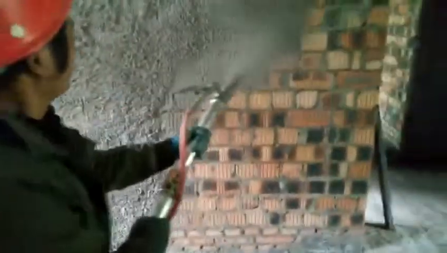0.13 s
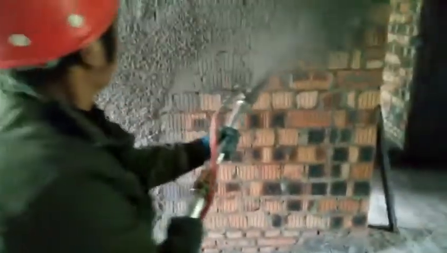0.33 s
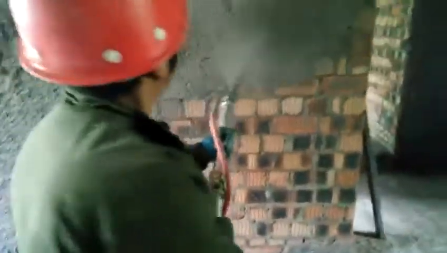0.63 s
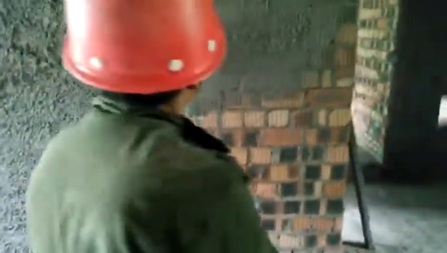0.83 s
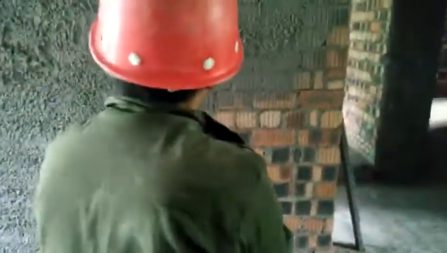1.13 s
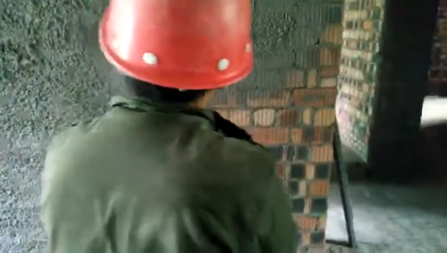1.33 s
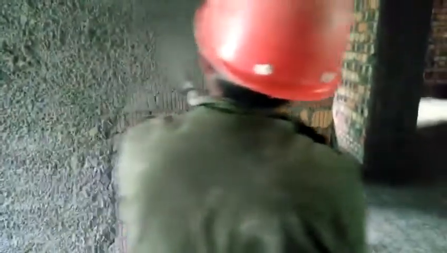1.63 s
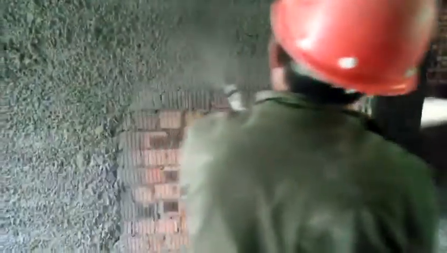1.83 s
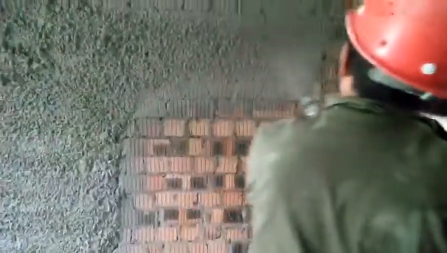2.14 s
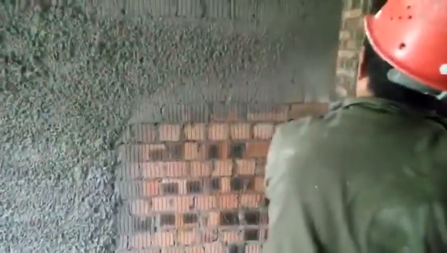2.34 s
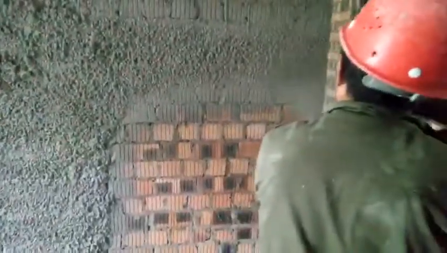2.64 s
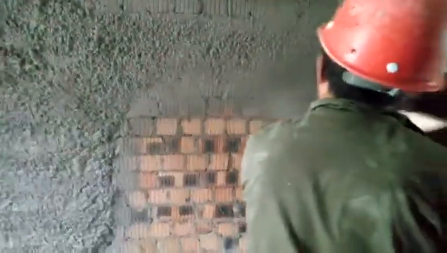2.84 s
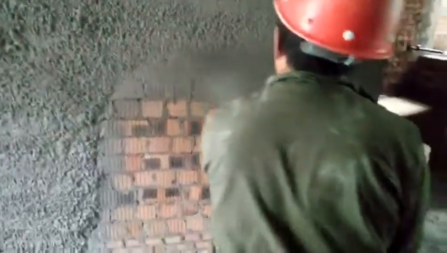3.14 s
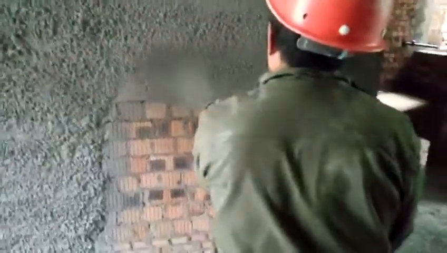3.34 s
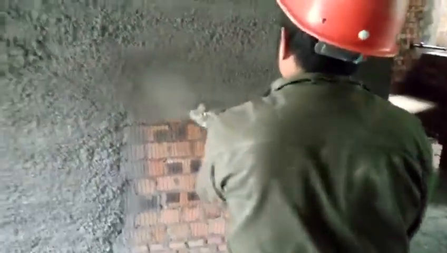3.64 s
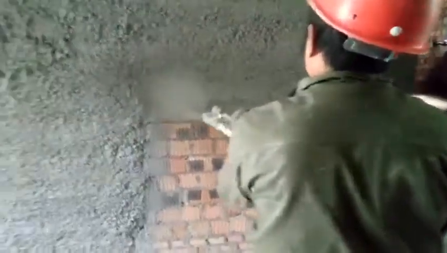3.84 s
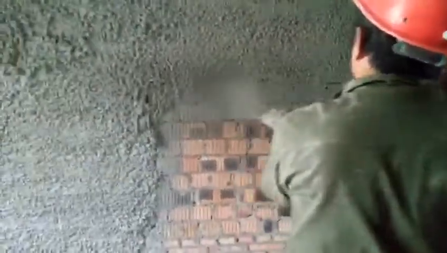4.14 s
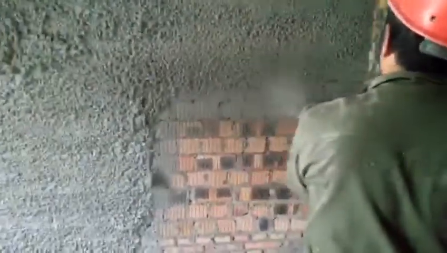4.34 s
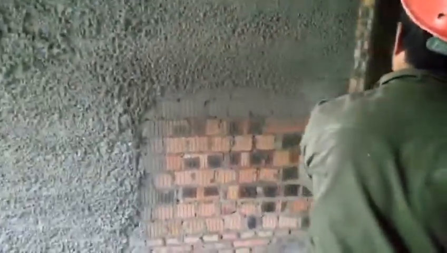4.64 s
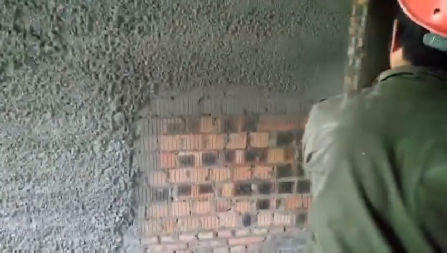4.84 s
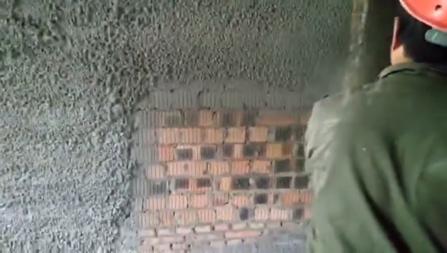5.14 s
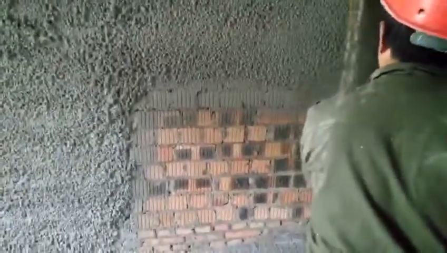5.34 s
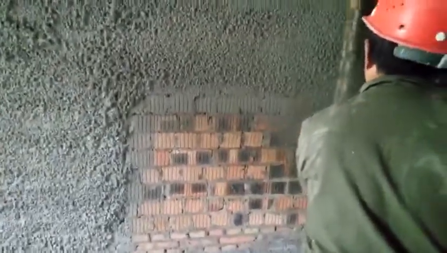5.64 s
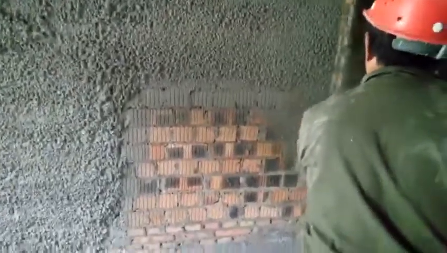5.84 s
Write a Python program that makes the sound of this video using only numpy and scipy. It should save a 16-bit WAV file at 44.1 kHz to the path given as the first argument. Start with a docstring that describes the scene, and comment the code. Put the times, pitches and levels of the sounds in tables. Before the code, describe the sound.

A compressed-air mortar gun blasts without pause, a step or two from the microphone. The dense midrange roar has a bright, noisy ring, sandy rasp and high hiss. It flutters unevenly as slugs and air pockets pass. Hollow gurgles and rough little puffs come from the wall as clots land. Bare concrete adds a short tail, and a faint machine booms far behind.

```python
"""Spraying wet mortar on a wall

A compressed-air gun sprays mortar on a brick wall in a bare concrete room, a step or two away.
The air jet is filtered noise peppered with sand clicks: it roars, rings, rasps and hisses.
The blast on the wall gurgles through three sliding resonances, and clots land with rough little puffs.
The wall mirrors the gun, the room adds a short tail, and a machine drones faintly far off."""
import sys
import numpy as np
from scipy import signal
from scipy.fft import rfft, irfft, next_fast_len
from scipy.io import wavfile
from scipy.ndimage import uniform_filter1d, map_coordinates

SR = 44100
rng = np.random.default_rng(int(sys.argv[2]) if len(sys.argv) > 2 else 0)


def persist_wave(psi):
    """Save psi, clipped to +-1, as 16-bit WAV."""
    counts = np.round(np.clip(psi, -1, 1) * 32767).astype(np.int16)
    wavfile.write(sys.argv[1], SR, np.atleast_2d(counts).T)


N = 264159  # length in samples
TIME = np.arange(N) / SR  # seconds

# Table levels come before each layer's small trim, the room and the gain control.
# Tones of noise set how strong each pitch is within a layer, before the layer gets its level.

# The jet between slugs; its hiss is beamed and changes with the aim:
# time_s, roar_level_db, hiss_level_db, top_hiss_level_db
JET_LEVELS = [(0.0, -36, -44, -44), (0.12, -32, -45, -46.5), (0.19, -34, -46, -42.5),
              (0.4, -31.5, -43.5, -44), (0.87, -33, -43.5, -44), (1.02, -37.5, -47.5, -45),
              (1.28, -33.5, -43.5, -46), (1.55, -30.5, -44.5, -45.5), (2.2, -34, -44, -45),
              (2.7, -30.5, -43.5, -48.5), (3.2, -31.7, -46, -44.5), (3.95, -33.5, -44.5, -44),
              (4.45, -31.5, -45, -45.5), (4.75, -32.5, -44, -44.5), (5.35, -33, -43.5, -46.5),
              (5.7, -30, -46.5, -46), (5.99, -32.5, -44.5, -46)]
# Tone of the roar: pitch_hz, strength_db
ROAR_TONE = [(950, -24), (1350, -24.5), (1580, -5), (1700, -2.5), (1790, -4), (1910, 0), (2060, 0),
             (2170, -4), (2300, -16), (3500, -43)]
# Tone of the hiss at the nozzle's lip: pitch_hz, strength_db
HISS_TONE = [(3000, -21), (4300, -17.5), (4800, -10), (5600, 0.3), (6250, 2), (6900, 0.5), (7250, -20),
             (9000, -41)]
# Tone of the beamed top of the hiss: pitch_hz, strength_db
TOP_HISS_TONE = [(6000, -9), (7300, -3), (8200, -4), (9300, -1.1), (10700, -3), (11500, -6), (12200, -15),
                 (12800, -4.5)]
# Loudness of the nozzle's mouth: time_s, level_db
MOUTH_LEVELS = [(0.0, -37), (0.45, -38), (0.58, -36), (0.66, -35.5), (0.74, -36), (1.02, -38.5),
                (1.34, -35), (1.6, -39.5), (1.98, -35), (2.3, -37), (2.43, -34.5), (2.62, -37.5),
                (2.9, -34), (3.0, -38), (3.13, -34), (3.25, -35.5), (3.72, -38.5), (4.33, -37.5),
                (4.53, -35.5), (4.67, -39.5), (4.78, -33), (5.4, -34.5), (5.99, -36)]
# Resonances of the nozzle's mouth: pitch_hz, width_hz, strength_db
MOUTH_RESONANCES = [(1085, 131, 1), (1212, 144, 1.1), (1344, 215, 1.5), (1523, 116, 1)]
# Tone of the lower hiss: pitch_hz, strength_db
LOW_HISS_TONE = [(3600, -10), (4050, 2), (4700, 0), (5200, -1.5), (5700, -33)]
# Loudness of the lower hiss: time_s, level_db
LOW_HISS_LEVELS = [(0.0, -52), (0.22, -59), (0.23, -52), (0.58, -47), (0.6, -56), (1.35, -44), (1.5, -49.5),
                   (3.75, -49), (3.94, -58), (4.09, -48), (4.5, -55), (4.54, -46.5), (5.91, -52.5),
                   (5.99, -48)]
# Tone of the nozzle's bright ring, the crest of the roar: pitch_hz, strength_db
RING_TONE = [(1600, -36), (2020, -18), (2160, -2.5), (2340, 0.5), (2450, -3.5), (2600, -4), (2720, -14),
             (2950, -27), (4000, -38)]
# Loudness of the nozzle's ring: time_s, level_db
RING_LEVELS = [(0.0, -30.5), (0.45, -32.5), (0.65, -30.5), (1.05, -33), (1.5, -31), (1.9, -32),
               (2.15, -31.5), (2.6, -32), (2.97, -29), (3.12, -34.5), (3.3, -33), (4.05, -31), (4.6, -31),
               (4.85, -33), (5.05, -30.5), (5.3, -31.5), (5.55, -31.5), (5.88, -28.5), (5.99, -29)]
# Tone of the sandy rasp above the ring: pitch_hz, strength_db
RASP_TONE = [(2400, -30), (2750, 2.5), (3000, -2.5), (3350, -5), (3700, -8.5), (4050, -12.5), (4700, -27)]
# Loudness of the sandy rasp: time_s, level_db
RASP_LEVELS = [(0.0, -40.5), (0.7, -39.5), (0.9, -40.5), (1.3, -39.7), (1.47, -41), (1.72, -39),
               (2.0, -38.7), (2.15, -41.5), (2.45, -39.7), (2.77, -39), (3.35, -41.7), (3.55, -40.5),
               (4.65, -40), (4.82, -40.5), (5.1, -40.5), (5.3, -41), (5.88, -39), (5.99, -40.5)]
# Slugs of mortar pass the nozzle; the hiss drops by as much as the roar rises:
# middle_s, length_s, roar_rise_db, top_hiss_loss_db
MORTAR_SLUGS = [(0.65, 0.25, 2, 4), (0.755, .07, 3.5, -1), (1.17, 0.11, 0, 2), (1.53, 0.11, -0.5, 2.5),
                (2.87, 0.22, 1.0, 3.0), (4.06, 0.21, 1, 3), (4.5, 0.17, 0.3, 1.5), (4.83, 0.14, 0.3, 2.5),
                (5.04, 0.37, 1, 2.5), (5.18, 0.11, 0.3, 4), (5.685, 0.084, 2.2, -1), (5.83, 0.46, -0.5, 4)]
# Air pockets in the mortar shift the roar and make the hiss spit:
# middle_s, length_s, roar_change_db, hiss_change_db, top_hiss_change_db
POCKETS = [(0.325, .07, -2, 3, -2), (0.92, 0.062, 2, 3, -2), (1.37, 0.12, -2.5, 0, -3),
           (2.0, .09, 0.5, 2, -2.5), (2.27, 0.065, -2, 1, -1), (3.63, .1, 0.5, 2, -0.5),
           (4.13, 0.15, -2, 2, 0), (4.66, 0.16, -3, 0.5, -1), (5.36, 0.11, -1.5, -0.5, 1)]


def jet():
    """Air and mortar rush out: mouth and bore ring the roar, and sand peppers the rasp and hiss."""
    roar_db, hiss_db, top_db = curves(JET_LEVELS, glide_s=0.045)
    mouth_db, = curves(MOUTH_LEVELS, glide_s=0.018)
    low_db, = curves(LOW_HISS_LEVELS, glide_s=0.08)
    ring_db, = curves(RING_LEVELS, glide_s=0.05)
    rasp_db, = curves(RASP_LEVELS, glide_s=0.05)
    load_db, choke_db = humps(MORTAR_SLUGS)
    sag_db, spit_db, top_sag_db = humps(POCKETS)

    sand = impacts(per_second=2000, spread_db=2.0)
    rasp_sand = impacts(per_second=1500, spread_db=1.5)

    roar_air = turbulence(sputter_db=0.8, sputter_rate=150)
    roar = undb(roar_db + load_db + sag_db + 0.3) * colour(roar_air, ROAR_TONE)

    bore_air = turbulence(sputter_db=-2.0, sputter_rate=300) + undb(-18.5) * sand
    ring = undb(ring_db + load_db + sag_db) * colour(bore_air, RING_TONE)

    rasp_air = turbulence(sputter_db=1.2, sputter_rate=90) + undb(-11.0) * rasp_sand
    rasp = undb(rasp_db - 0.22) * colour(rasp_air, RASP_TONE)

    mouth_air = resonate(turbulence(sputter_db=1.5, sputter_rate=90), MOUTH_RESONANCES)
    # the nozzle's mouth radiates little below this cut
    mouth = undb(mouth_db + 0.47) * low_cut(mouth_air, cut_hz=940)

    low_air = turbulence(sputter_db=2.5, sputter_rate=37) + undb(-11) * sand
    low_hiss = undb(low_db - 2.4) * colour(low_air, LOW_HISS_TONE)

    hiss_air = turbulence(sputter_db=1.0, sputter_rate=51) + undb(-1.0) * sand
    hiss = undb(hiss_db - load_db + spit_db - 0.7) * colour(hiss_air, HISS_TONE)

    top_air = turbulence(sputter_db=0.7, sputter_rate=35) + undb(-14.5) * sand
    top_hiss = undb(top_db - choke_db + top_sag_db + 3.0) * colour(top_air, TOP_HISS_TONE)
    return roar + ring + rasp + mouth + low_hiss + hiss + top_hiss


# The three hollow resonances of the blast, each swelling as the gun sweeps.
# Low resonance: time_s, level_db
BLAST_LOW_LEVELS = [(0.0, -61), (0.3, -55), (0.95, -49.5), (1.2, -50.5), (1.63, -52.5), (1.78, -47.5),
                    (2.1, -46), (2.39, -51.5), (2.6, -40), (2.79, -56), (3.05, -46), (3.2, -56),
                    (3.37, -43.5), (3.7, -66), (3.8, -49), (4.0, -56), (4.12, -68), (4.3, -49), (4.52, -61),
                    (4.68, -46.5), (4.78, -58), (5.27, -61.5), (5.38, -53), (5.98, -59)]
# Middle resonance: time_s, level_db
BLAST_MID_LEVELS = [(0.0, -47), (0.2, -46), (0.61, -46.5), (0.71, -53.5), (0.92, -52.5), (1.25, -45),
                    (1.43, -51), (1.99, -45), (2.48, -49), (2.77, -47.5), (2.85, -49), (3.2, -42.5),
                    (3.54, -50), (3.75, -44.5), (4.02, -48.5), (4.2, -42), (4.38, -50.5), (4.5, -50),
                    (4.7, -54), (4.78, -44.5), (5.33, -46), (5.46, -54.5), (5.66, -47.5), (5.98, -49)]
# High resonance: time_s, level_db
BLAST_HIGH_LEVELS = [(0.0, -50), (0.2, -67), (0.4, -69), (0.9, -76), (1.2, -50), (1.33, -55), (1.48, -44),
                     (1.75, -43.5), (2.2, -56), (2.33, -51), (2.65, -46), (2.75, -56), (3.12, -47),
                     (3.5, -60), (3.6, -47), (3.72, -74), (3.9, -62), (4.0, -53), (4.65, -51), (5.98, -58)]
# The middle resonance slides with the gun's position: time_s, centre_hz
BLAST_MID_PITCH = [(0.0, 615), (0.93, 617), (1.15, 577), (1.43, 597), (2.23, 583), (2.37, 632), (3.94, 596),
                   (5.24, 653), (5.44, 610), (5.98, 633)]
# Tone of the dull thud of clots on the wall: pitch_hz, strength_db
THUD_TONE = [(120, -27), (210, -25.5), (270, -14), (330, -7.5), (480, -2), (700, -10)]


def blast():
    """The jet strikes the wall: the hollow between gun and wall resonates, and clots thud."""
    mid_hz, = curves(BLAST_MID_PITCH, glide_s=0.046)
    low = hollow(BLAST_LOW_LEVELS, 394, width_hz=87.0, wander_hz=13.7, gurgle_db=1.7, throb_db=0.7)
    mid = hollow(BLAST_MID_LEVELS, mid_hz, width_hz=151, wander_hz=20, gurgle_db=1.5, throb_db=1.0)
    high = hollow(BLAST_HIGH_LEVELS, 862, width_hz=207, wander_hz=29, gurgle_db=2.0, throb_db=1.5)
    thuds = colour(impacts(per_second=250, spread_db=1.5), THUD_TONE)
    return undb(-0.5) * low + undb(1.5) * mid + undb(-3.0) * high + undb(-56.0) * thuds


def hollow(table, hz, width_hz, wander_hz, gurgle_db, throb_db):
    """A steep resonance with a wandering centre, driven by air and clots; it throbs unevenly."""
    level_db, = curves(table, glide_s=0.014)
    clots = impacts(per_second=240, spread_db=1.5)
    push = turbulence(sputter_db=gurgle_db, sputter_rate=21) + undb(-2.0) * clots
    centre_hz = hz + wander_hz * walk(7.8)
    turn = np.exp(2j * np.pi * np.cumsum(centre_hz) / SR)
    # shift the centre to zero pitch, keep only what is near it, then shift back
    low_pass = signal.butter(3, width_hz / 2, fs=SR, output="sos")
    ring = signal.sosfilt(low_pass, push / turn)
    throbbing = np.real(ring * turn) * undb(throb_db * walk(40))
    return undb(level_db) * unit(throbbing)


# Large clots land with a puff: middle_s, pitch_hz, peak_level_db
CLOT_PUFFS = [(0.03, 650, -41), (0.143, 612, -32), (0.189, 623, -36), (0.25, 640, -45), (0.31, 640, -38),
              (0.42, 610, -43), (0.498, 587, -33.5), (0.576, 585, -32), (1.48, 815, -34), (1.511, 850, -37),
              (1.664, 563, -38), (1.728, 411, -38), (1.743, 890, -39.5), (1.78, 370, -35.5),
              (1.821, 378, -38), (1.937, 563, -36), (1.972, 396, -33), (2.009, 560, -33), (2.31, 830, -38),
              (2.539, 840, -37), (2.574, 387, -45), (2.636, 407, -36), (3.127, 426, -34), (3.13, 626, -39),
              (3.213, 562, -39), (3.254, 417, -35), (3.305, 395, -33), (3.71, 600, -38), (4.152, 570, -39),
              (4.203, 550, -38), (4.25, 670, -34), (4.651, 412, -37.5), (4.693, 416, -36),
              (4.789, 626, -38), (4.945, 634, -37), (5.132, 673, -36), (5.171, 680, -36.5),
              (5.294, 660, -36), (5.351, 588, -33), (5.654, 586, -34), (5.801, 630, -37)]


def clots_landing():
    """Each large clot of mortar lands with a short, rough puff at its own pitch."""
    return puffs(CLOT_PUFFS, length_s=0.033)


def puffs(table, length_s):
    """A wave with a slightly shaky phase swells and fades smoothly at each listed moment."""
    out = 0
    jitter_rad = 0.3 * walk(50)
    for middle_s, hz, db in table:
        since = TIME - middle_s
        phase = 2 * np.pi * (hz * since + rng.random()) + jitter_rad
        out = out + undb(db) * hump(middle_s, length_s) * np.cos(phase)
    return out


def mottle(x, patchy_db, patch_hz, patch_s, size=2048, count=15):
    """Neighbouring pitches swell and fade at each other's cost, so the rush sounds clumped."""
    overlap = size * 3 // 4
    hz, t, bins = signal.stft(x, SR, nperseg=size, noverlap=overlap)
    place = np.meshgrid(hz / patch_hz, t / patch_s, indexing="ij")
    chance = rng.standard_normal((size // 2, size // 2))
    patches = unit(map_coordinates(chance, place, order=3, mode="mirror"))
    gain = undb(patchy_db * patches)
    # hold the average power gain of nearby pitches at one
    gain = gain / np.sqrt(uniform_filter1d(gain ** 2, count, axis=0))
    return signal.istft(bins * gain, SR, nperseg=size, noverlap=overlap)[1][:N]


def wall_echo(x, lag_s, sway_s, sway_rate, echo_db):
    """The wall mirrors the gun; the lag wanders as the hand sweeps, so the rush phases slightly."""
    lag = lag_s + sway_s * walk(sway_rate)
    echo = map_coordinates(x, [(TIME - lag) * SR], order=3)
    return (x + undb(echo_db) * echo) / np.hypot(1, undb(echo_db))


def room(x, t60_s, wet_db, turn_s, count=15):
    """Bare concrete returns a dense, duller tail; as the gun moves, other echo paths take over."""
    t, wet = TIME[:SR // 2], 0
    for k in range(count):
        soft_noise = signal.lfilter([1, 1], [2], rng.standard_normal(len(t)))  # weaker treble
        tail = soft_noise * undb(-60 * t / t60_s) * (t > 0.004)
        tail = tail / np.sqrt(np.sum(tail ** 2) * 2)  # half power: 3 dB under wet_db
        # fade from one echo path to the next, going round in a circle
        away = np.abs((TIME / turn_s - k + count / 2) % count - count / 2)
        share = np.sqrt(np.maximum(0, 1 - away))
        wet = wet + signal.fftconvolve(x * share, tail)[:N]
    return (x + undb(wet_db) * wet) / np.hypot(1, undb(wet_db))


# Loudness of the far drone: time_s, level_db
DRONE_LEVELS = [(0.0, -64), (0.33, -72.5), (0.53, -67), (0.79, -78), (1.47, -72), (1.69, -73), (1.8, -59),
                (2.0, -67), (2.15, -63), (2.33, -67), (2.5, -65), (2.68, -60), (2.81, -71), (3.06, -65),
                (3.26, -78), (3.5, -65), (4.25, -78), (4.6, -68), (4.95, -72), (5.25, -65.5), (5.8, -77),
                (5.98, -60)]
# Resonances of the drone: pitch_hz, width_hz, strength_db
DRONE_RESONANCES = [(119, 16, 1), (134, 22, 0), (132, 53, -3)]
# Loudness of the building's low rumble: time_s, level_db
RUMBLE_LEVELS = [(0.0, -72), (0.55, -73), (0.75, -82), (1.2, -67), (1.8, -72), (2.2, -74), (2.95, -66),
                 (3.5, -71.5), (4.15, -74), (4.8, -70), (5.45, -68), (5.99, -69)]
# Resonances of the rumble: pitch_hz, width_hz, strength_db
RUMBLE_RESONANCES = [(38, 23, -5), (64.6, 11, 2.5), (85, 92, -7.5)]
# The drone swells in short booms, with deeper thumps between them: middle_s, pitch_hz, peak_level_db
DRONE_BOOMS = [(0.022, 138, -52), (1.58, 132, -53), (1.761, 128, -51), (1.808, 68, -58), (1.822, 127, -51),
               (2.131, 128, -52), (2.466, 133, -51), (2.597, 130, -52), (2.652, 139, -47),
               (2.893, 129, -56), (2.894, 75, -54), (3.049, 133, -51.5), (3.06, 66, -58), (3.31, 63, -65),
               (3.423, 65, -58), (5.217, 132, -53)]


def drone():
    """A distant machine, probably the compressor, booms unsteadily over the building's low rumble."""
    drone_db, = curves(DRONE_LEVELS, glide_s=0.037)
    rumble_db, = curves(RUMBLE_LEVELS, glide_s=0.1)
    hum = resonate(turbulence(sputter_db=2.5, sputter_rate=23), DRONE_RESONANCES)
    rumble = resonate(turbulence(sputter_db=0.0, sputter_rate=36), RUMBLE_RESONANCES)
    booms = puffs(DRONE_BOOMS, length_s=0.05)
    return undb(drone_db + 1.5) * hum + undb(rumble_db + 1.5) * rumble + booms


def turbulence(sputter_db, sputter_rate):
    """Rushing air: noise, choked unevenly by lumps of mortar when sputter_db is not zero."""
    return rng.standard_normal(N) * undb(sputter_db * walk(sputter_rate))


def impacts(per_second, spread_db):
    """Random hits as single-sample clicks, many small and a few large, with an rms of one."""
    hit = rng.random(N) < per_second / SR
    size = undb(spread_db * np.minimum(rng.exponential(size=N), 5))
    return unit(hit * size * np.sign(rng.standard_normal(N)))


def walk(rate):
    """Smooth chance with a spread of one, changing about rate times a second."""
    t = TIME[::100]
    hz = np.fft.rfftfreq(len(t), t[1])
    spectrum = rfft(rng.standard_normal(len(t))) * np.exp(-(hz / rate) ** 2)
    return np.interp(TIME, t, unit(irfft(spectrum, len(t))))


def curves(table, glide_s):
    """Each column of a table as a value per sample, with its corners rounded."""
    s, *columns = np.transpose(table)
    span = max(1, int(glide_s * SR))
    return [uniform_filter1d(np.interp(TIME, s, c), span, mode="nearest") for c in columns]


def hump(middle_s, length_s):
    """One smooth rise and fall between zero and one."""
    return np.cos(np.pi * np.clip((TIME - middle_s) / length_s, -0.5, 0.5)) ** 2


def humps(table):
    """Add up smooth humps; one curve in dB for each column of heights."""
    return sum(np.outer(heights_db, hump(s, length)) for s, length, *heights_db in table)


def undb(db):
    """Decibels to gain."""
    return 10 ** (np.asarray(db) / 20)


def unit(x):
    """Scale to an rms of one."""
    return x / np.sqrt(np.mean(x ** 2))


def shape(x, response):
    """Filter by a gain that depends on pitch; the result has an rms of one."""
    size = next_fast_len(N + SR // 2)
    hz = np.maximum(np.fft.rfftfreq(size, 1 / SR), 1)
    return unit(irfft(rfft(x, size) * response(hz), size)[:N])


def colour(x, points):
    """Filter by a tone of (pitch_hz, strength_db) points that falls away steeply beyond its ends."""
    f, db = np.transpose(points)

    def response(hz):
        inside = undb(np.interp(np.log(hz), np.log(f), db))
        return inside * np.minimum(1, np.minimum(hz / f[0], f[-1] / hz)) ** 2
    return shape(x, response)


def resonate(x, modes):
    """Filter by steep-sided resonances whose powers add."""
    def response(hz):
        peaks = [undb(db) / (1 + ((hz - f * f / hz) / width) ** 2) for f, width, db in modes]
        return np.sqrt(sum(peak ** 2 for peak in peaks))
    return shape(x, response)


def low_cut(x, cut_hz, order=12):
    """Remove what lies below a pitch, steeply."""
    return shape(x, lambda hz: 1 / np.sqrt(1 + (cut_hz / hz) ** (2 * order)))


def scene():
    """The gun close to the wall, in its room, with clots landing nearby, over the drone."""
    rush = mottle(jet(), patchy_db=2.5, patch_hz=69.97, patch_s=0.045)
    gun = wall_echo(rush, lag_s=0.0022, sway_s=0.000292, sway_rate=1.41, echo_db=-18)
    in_room = room(gun + blast(), t60_s=0.17, wet_db=-8.0, turn_s=0.349)
    return (in_room + clots_landing() + drone())[None]


def record(dry):
    """The recorder's gain control gently evens out the swells, and the top is cut."""
    window_s, taken_back = 0.094, 0.23  # listening time; share of each swell (in dB) taken back
    span = max(1, int(window_s * SR))
    power = uniform_filter1d(uniform_filter1d(dry ** 2, span), span // 2 + 1)
    gain = (power / np.mean(power)) ** (-taken_back / 2)
    top_cut = signal.ellip(8, 0.2, 70, 12150, fs=SR, output="sos")  # steep cut above 12150 Hz
    return signal.sosfilt(top_cut, dry * gain)


dry = scene()
out = record(dry)
persist_wave(out)
```